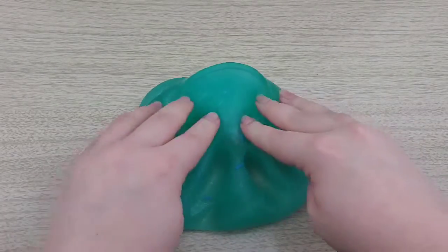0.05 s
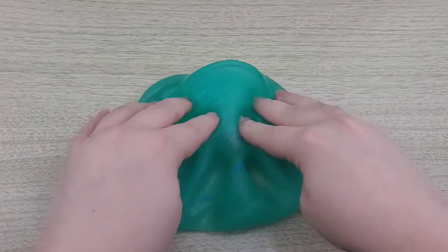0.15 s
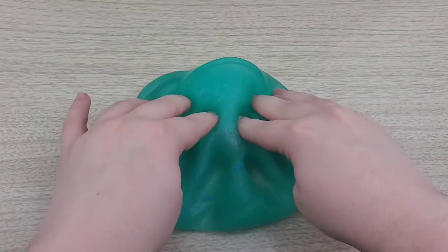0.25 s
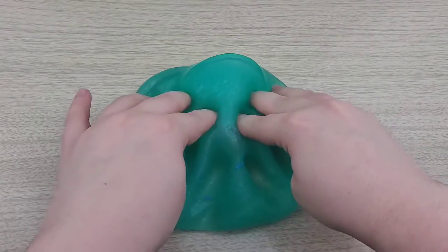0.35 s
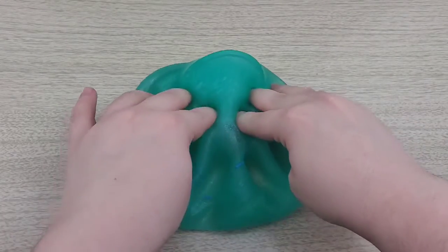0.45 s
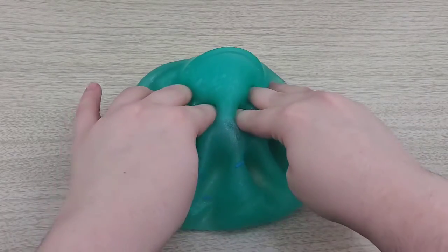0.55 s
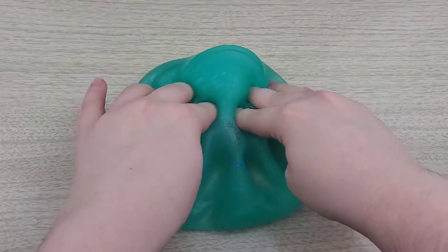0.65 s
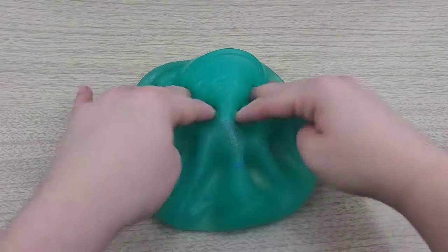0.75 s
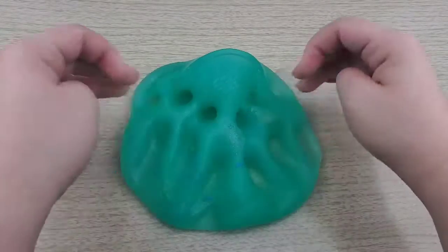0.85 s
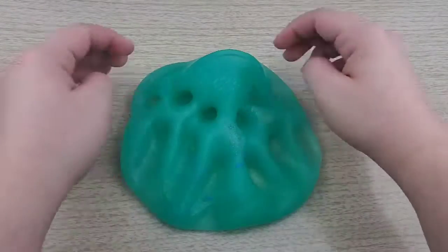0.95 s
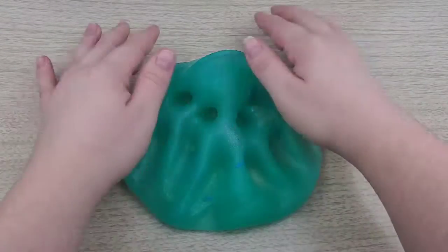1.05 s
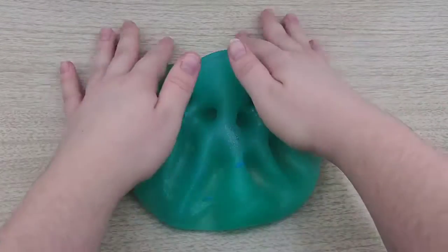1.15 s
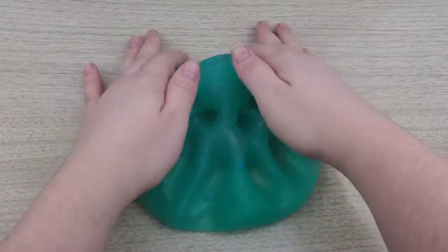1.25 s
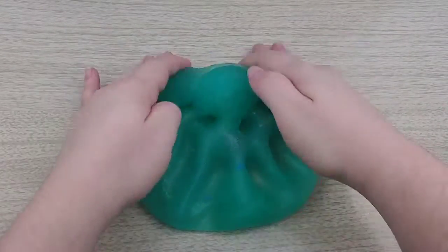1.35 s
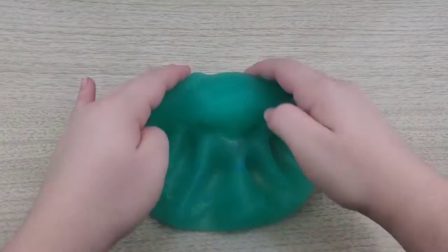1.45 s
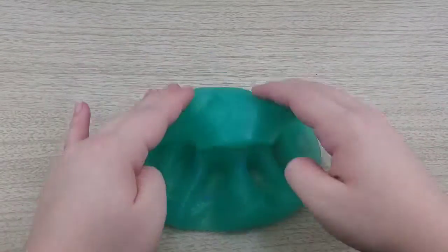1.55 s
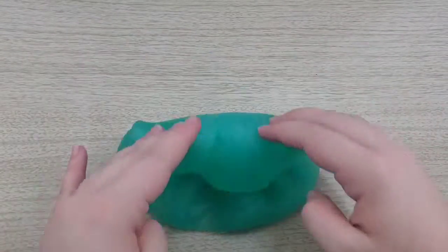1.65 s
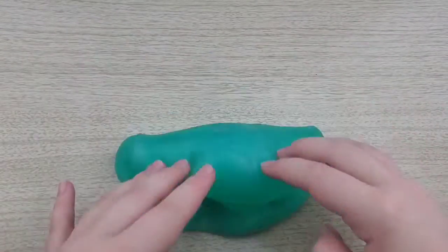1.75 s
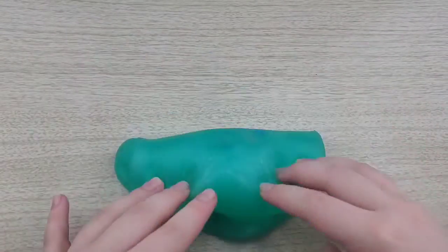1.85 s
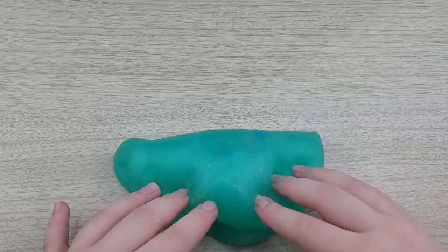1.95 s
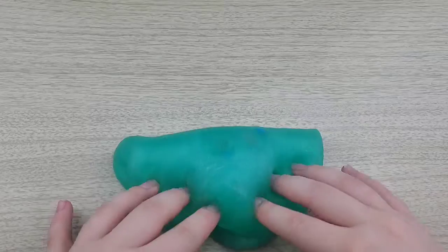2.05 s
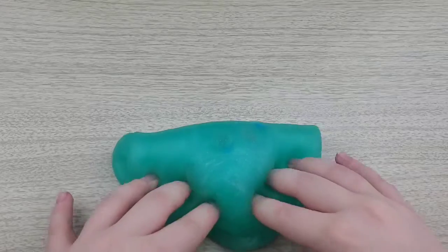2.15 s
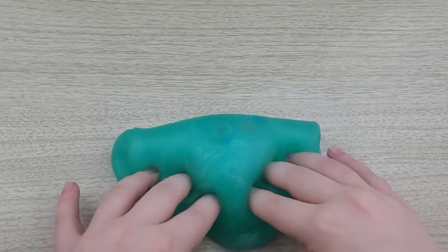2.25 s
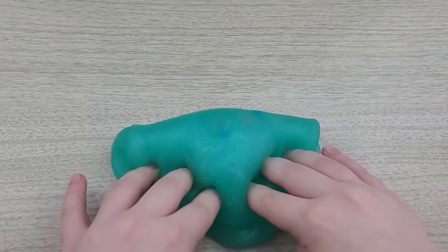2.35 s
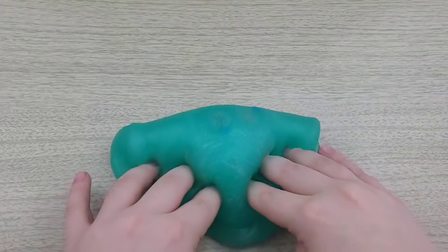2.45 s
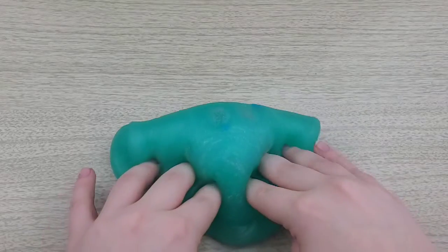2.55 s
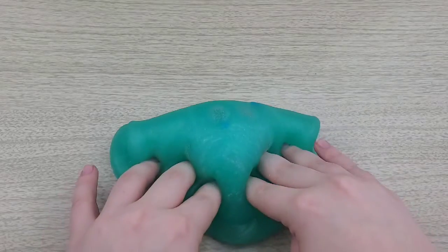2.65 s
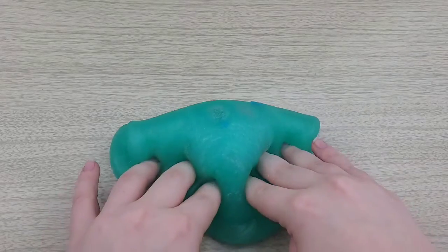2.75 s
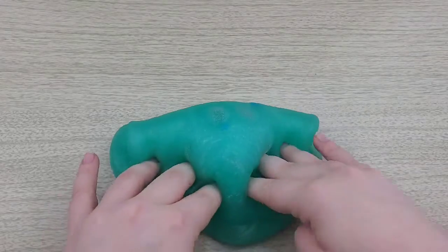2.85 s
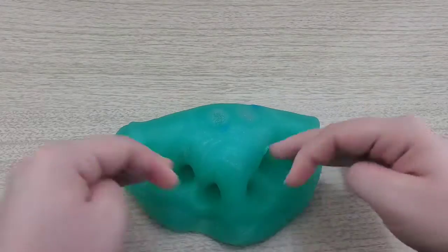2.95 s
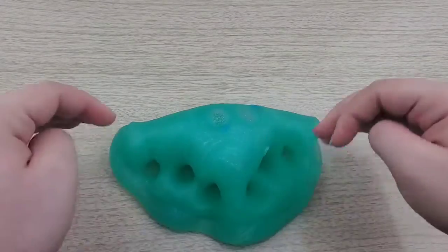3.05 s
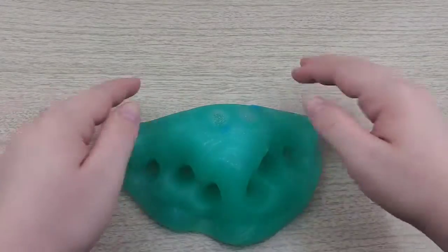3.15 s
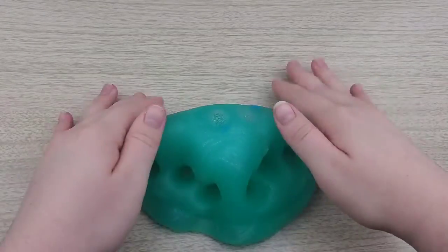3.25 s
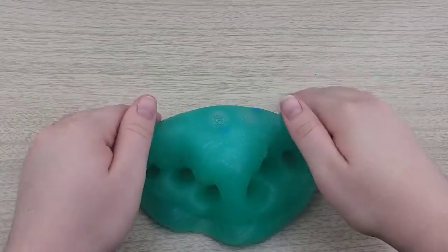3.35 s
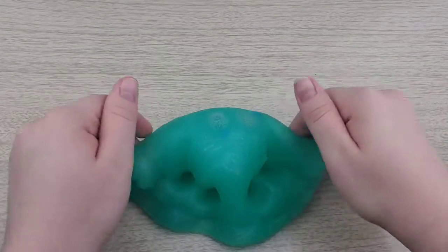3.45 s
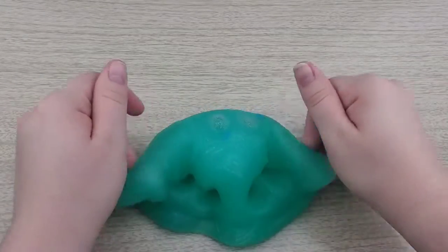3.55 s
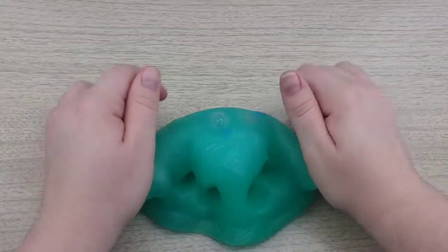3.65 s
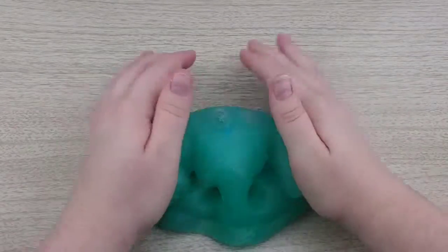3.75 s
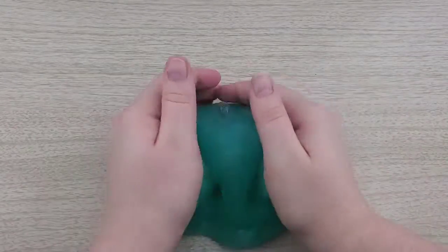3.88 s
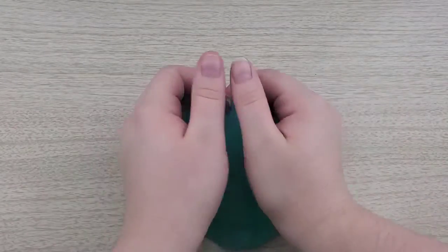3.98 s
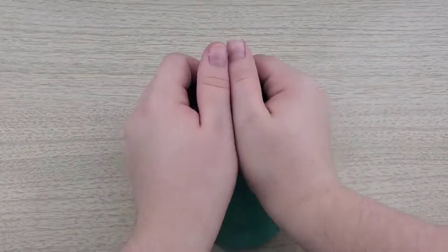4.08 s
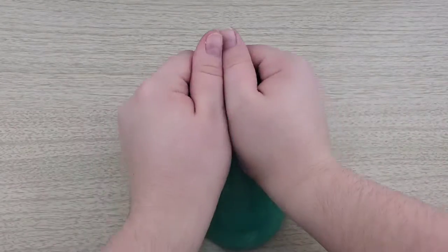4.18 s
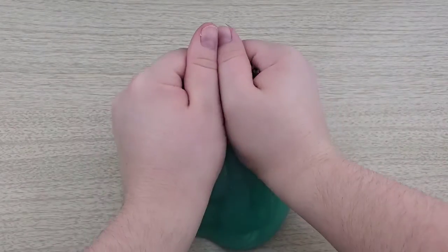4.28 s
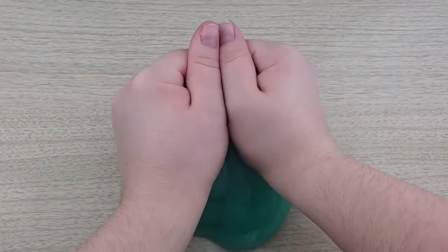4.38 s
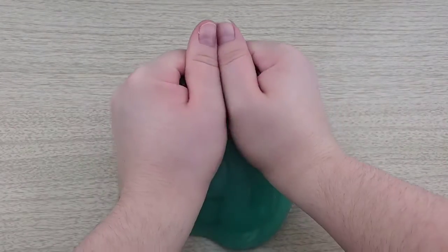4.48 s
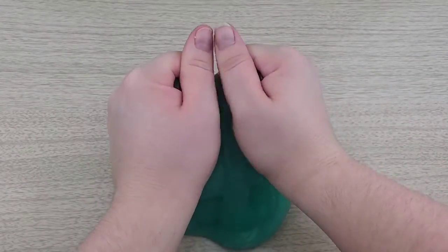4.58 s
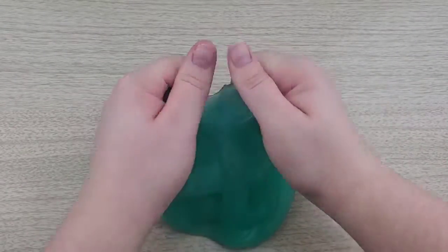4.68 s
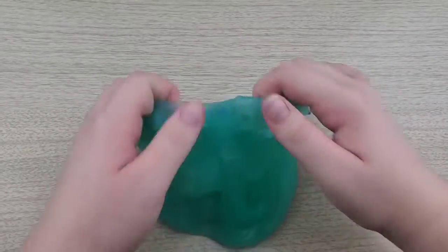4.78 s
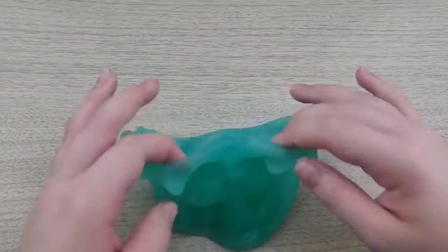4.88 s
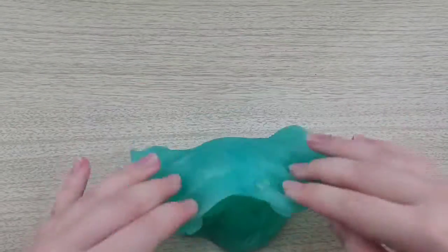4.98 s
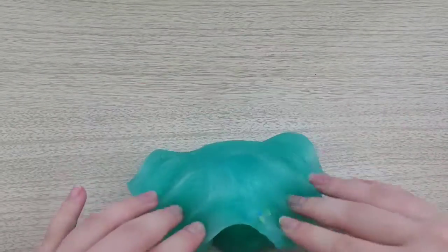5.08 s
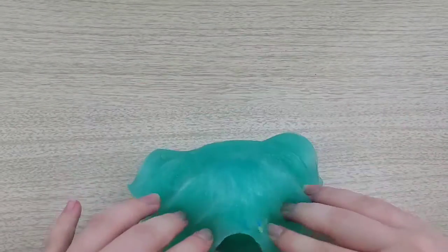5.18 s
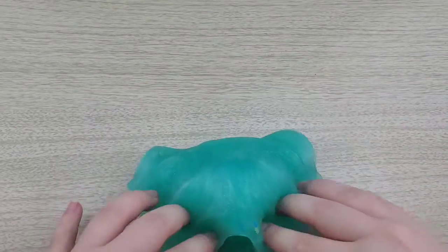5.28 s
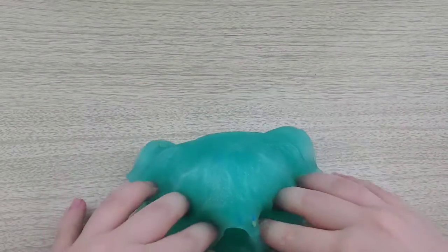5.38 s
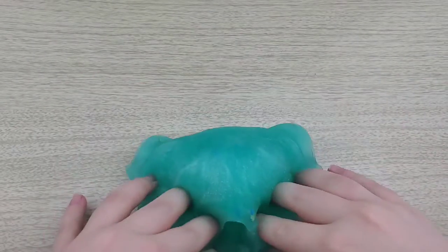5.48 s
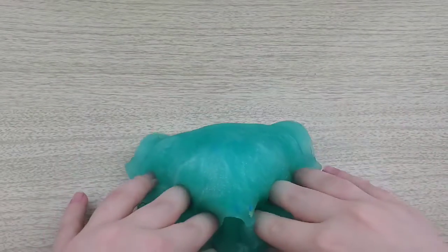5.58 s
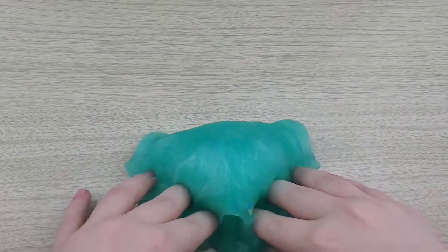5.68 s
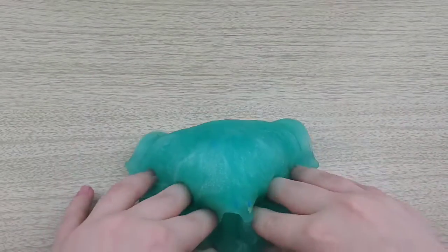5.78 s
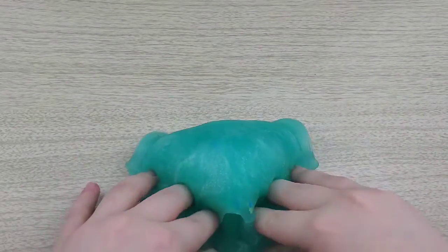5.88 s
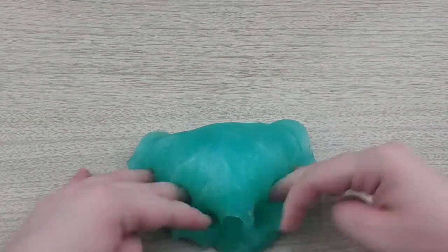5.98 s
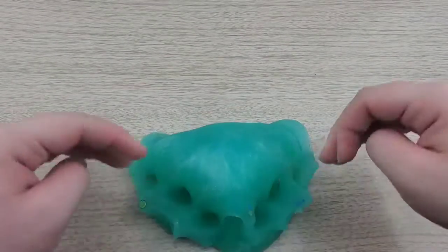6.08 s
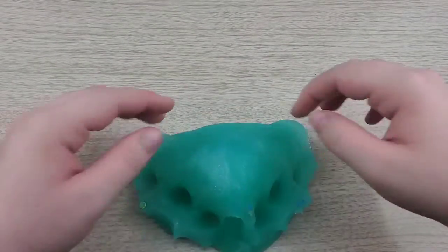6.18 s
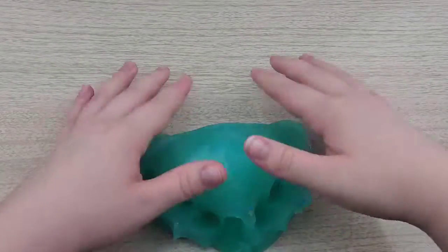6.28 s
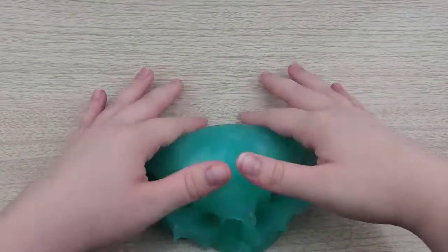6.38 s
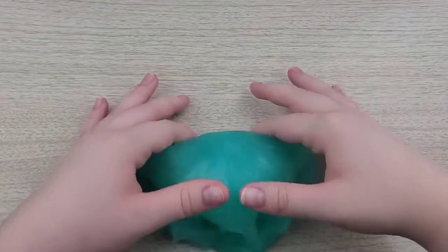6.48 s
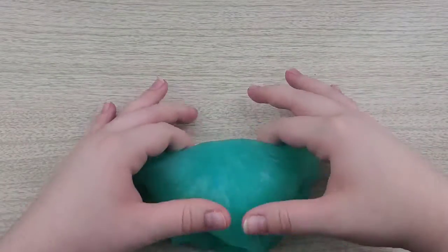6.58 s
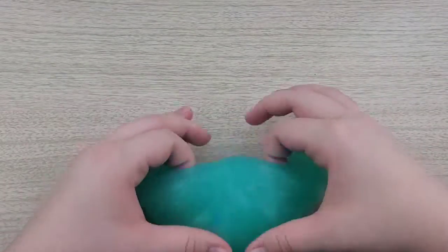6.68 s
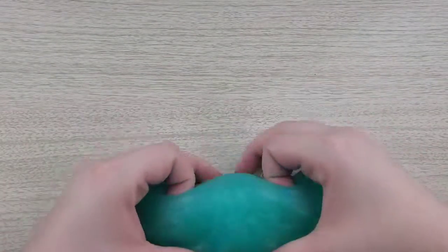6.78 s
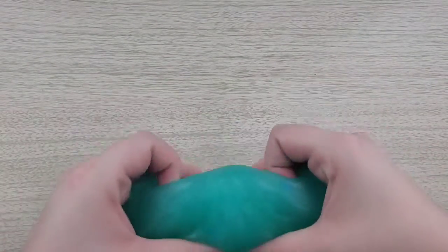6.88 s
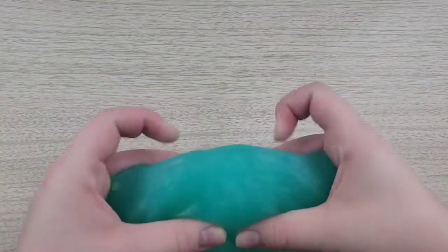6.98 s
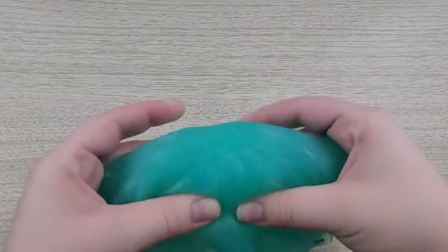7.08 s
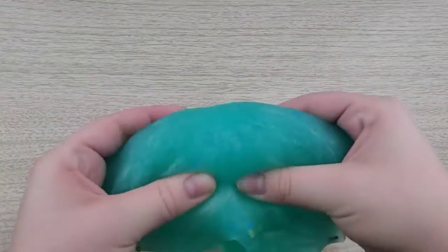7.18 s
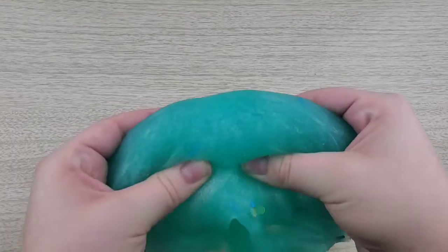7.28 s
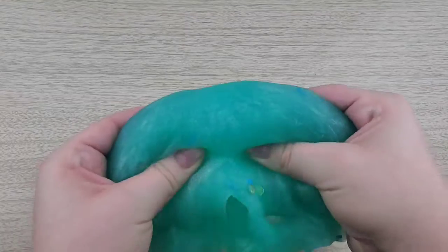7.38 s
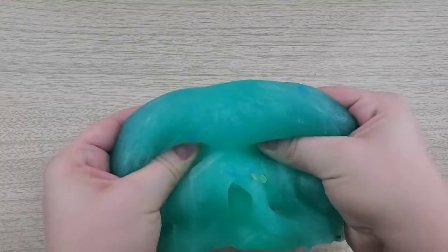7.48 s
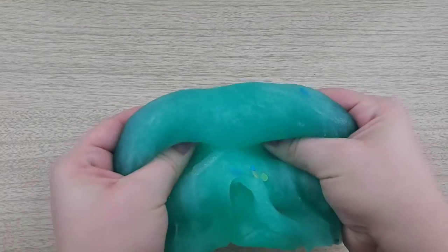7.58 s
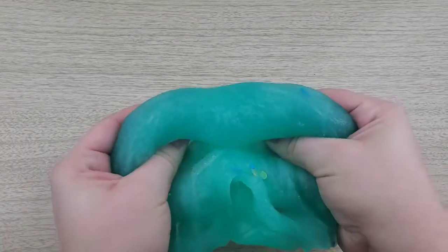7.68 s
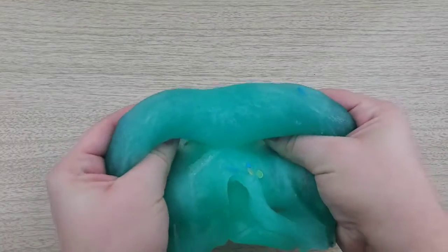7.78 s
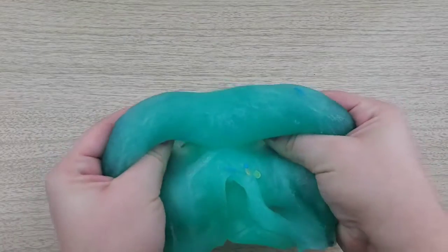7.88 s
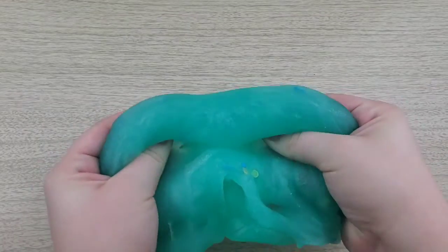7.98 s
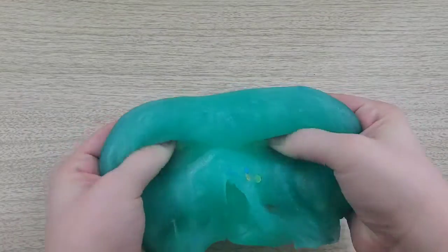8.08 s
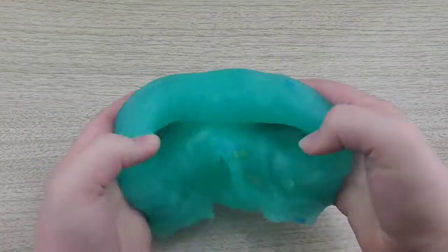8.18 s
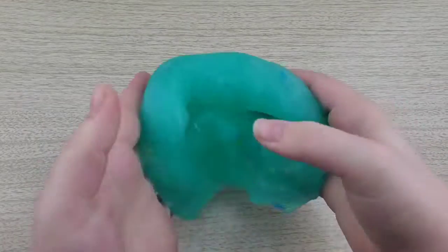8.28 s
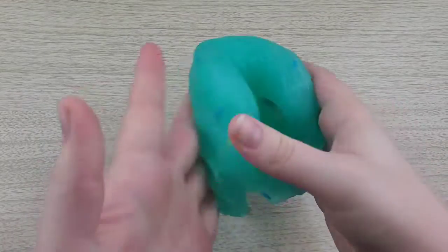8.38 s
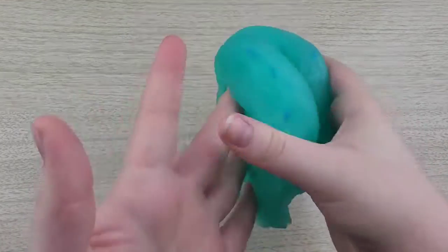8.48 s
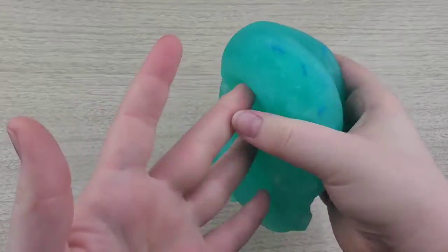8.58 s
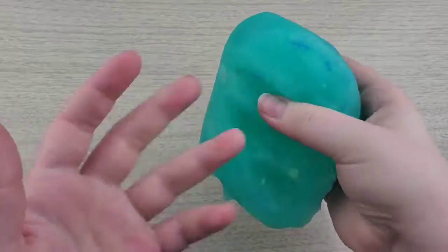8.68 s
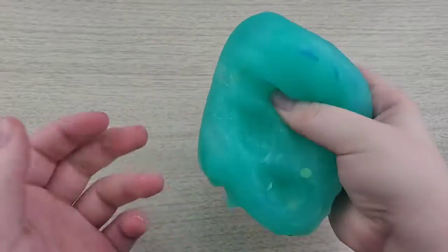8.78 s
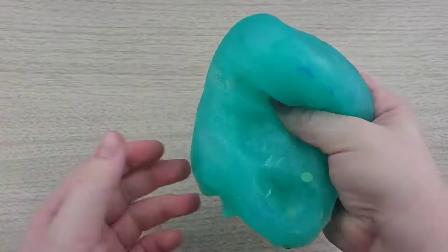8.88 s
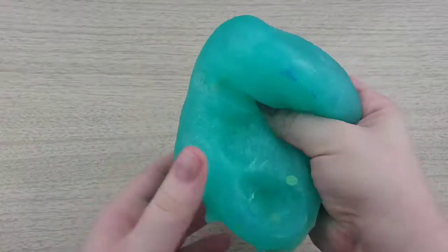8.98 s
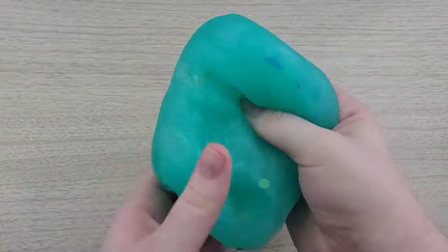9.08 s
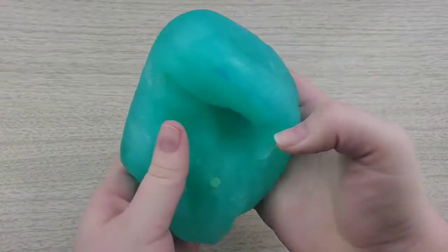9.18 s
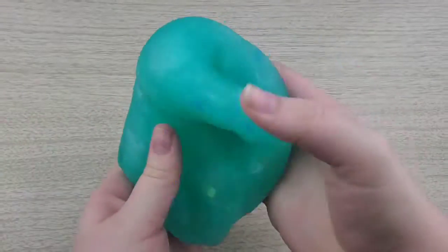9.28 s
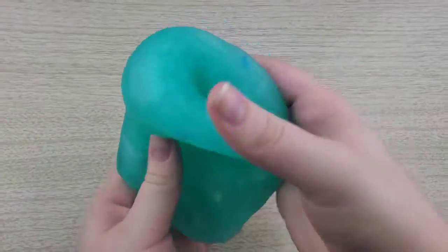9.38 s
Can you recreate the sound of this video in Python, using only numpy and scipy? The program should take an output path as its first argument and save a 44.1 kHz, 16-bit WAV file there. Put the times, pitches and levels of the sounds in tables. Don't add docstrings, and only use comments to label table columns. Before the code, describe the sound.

Close stereo sound of thick slime kneaded on a table in a small quiet room, with a faint low rumble and distant machine hum throughout. Near silence until 1.0 s, when a sharp bubble crack bursts with a hollow pop, wet peel and dull thud. Faint sticky rustle and small ticks follow, with a modest pop at 2.4. At 3.1-3.2 several hard snaps rattle off, then soft thuds to 3.5. From 4.4 to 4.7 come heavy, loud hollow pops and cracks, trailed by wet crackling around 4.9; the background dips, then recovers. Three very loud rapid snaps hit at 6.2. From 6.8 to 7.9 smaller pops and clicks scatter, with a tiny rising squeak at 7.1 and clearer snaps at 7.4 and 7.85. Around 8.35 a sticky sizzle and wet pop, then thin peeling crackles to 8.9, and last soft clicks near 9.35. Brief room echo follows bursts.

```python
import sys
import numpy as np
from scipy import signal
from scipy.fft import rfft, irfft
from scipy.io import wavfile
from scipy.ndimage import uniform_filter1d

SR = 44100
rng = np.random.default_rng(int(sys.argv[2]) if len(sys.argv) > 2 else 0)


def inscribe(sig):
    pcm = np.round(np.clip(np.atleast_2d(sig).T, -1, 1) * 32767)
    wavfile.write(sys.argv[1], SR, pcm.astype(np.int16))


def boost(x):
    u = np.asarray(x, float) / 20
    return 10 ** u


N = 416304

# (t/s, peak level/dB, opening f/Hz, crack over ring level/dB, right port lag/ms)
SNAPS = [(0.996, -25, 12700, 6, .14), (1.0316, -6.5, 4550, -7, .098), (2.3709, -36, 8500, -2, .038),
         (3.1188, -21, 5840, -4, .24), (3.1385, -6.5, 4430, 5, -.15), (3.164, -11, 4350, -12, .016),
         (3.1884, -26, 6300, -8, .3), (4.4283, -10, 3600, 3, .11), (4.4779, -5, 3400, 2, .033),
         (4.5482, -3.5, 4250, -15, .042), (4.6808, -28, 12900, -3.5, -.08),
         (4.6902, -30, 14080, -1.5, .069), (6.1865, -4.5, 5100, -4.5, .2), (6.2072, -2, 5450, .6, .13),
         (6.2269, -6, 5000, 5, .066), (6.8102, -33, 9500, 2.5, -.07), (6.8358, -30, 4800, 3, .17),
         (6.9085, -38, 4670, 7, .062), (7.207, -46, 4780, -5, .12), (7.4, -27, 7000, 2, .14),
         (7.8392, -29, 6180, -.6, .078), (7.8586, -17.5, 6500, 3.5, .15), (8.3714, -22, 6600, -9, .35),
         (9.335, -37, 14300, -5, .14), (1.0318, -11, 5750, -6, .1), (3.1645, -8.5, 6100, -1, .02),
         (2.3707, -39, 4300, 0, .04), (7.2068, -50, 3400, -12, -.1), (1.032, -10, 12800, -13, .1),
         (4.4768, -13, 5600, 2, .05)]
# (t/s, peak level/dB, opening f/Hz, crack over ring level/dB)
TICKS = [(1.4676, -55, 13760, -7.5), (1.829, -47, 6070, -7), (1.8594, -62, 14970, -1),
         (2.28, -58, 12000, 1.5), (2.409, -45, 6300, 2), (3.3862, -51, 5200, -13),
         (4.2512, -64, 6300, -21.5), (4.361, -54, 14050, -1), (4.7278, -43, 12000, 0),
         (4.817, -64, 9030, 2.5), (4.862, -49, 5000, -8), (4.8711, -43, 15100, 3), (4.9047, -40, 4090, -.6),
         (5.1377, -58.5, 9260, 0), (5.21, -59, 12000, -1), (5.3007, -66, 15400, 0), (5.524, -66, 5400, -15),
         (6.8597, -42, 5000, -12), (6.9465, -47, 3750, 2), (6.979, -41, 4000, 1.5), (7.1172, -53, 4220, -9),
         (7.1936, -49, 4460, -15), (7.5632, -45, 13000, 6), (7.6052, -62, 14780, 0),
         (7.6386, -60, 14950, -2), (8.4195, -43, 14670, -11), (8.5144, -45, 6450, -8),
         (8.8347, -46.5, 15430, -1.5), (8.8687, -45, 9310, -6.5), (9.3635, -42, 13500, 1),
         (6.815, -44, 6000, 0), (6.9145, -44, 6000, 0), (9.3445, -42, 5000, -3), (9.348, -43, 5000, 0)]
# (t/s, peak level/dB, cavity f/Hz, sharpness, room share level/dB)
POCKETS = [(0.997, -44.5, 700, 1.2, 4.5), (1.012, -44, 2200, 2.4, -9), (1.0315, -23, 1400, 1, 2),
           (1.033, -31, 640, 6, -5), (1.033, -33, 1040, 3.5, -5), (2.371, -39, 2100, .6, -7),
           (2.4097, -33.5, 655, 2, -12), (3.1191, -35, 650, 2.5, -1), (3.1388, -17, 1150, 3.8, -10),
           (3.14, -24, 650, 5, -12), (3.166, -42, 660, 5, -3), (3.139, -13, 1900, 1.8, -11),
           (3.1637, -26, 2500, .8, 6), (4.4277, -14, 2400, .9, -7), (4.4315, -16, 2900, 1.1, -4),
           (4.428, -33, 800, .78, -1), (4.4762, -3.5, 2450, 1, -5), (4.4765, -11, 1800, .6, -10),
           (4.481, -11, 2800, 1.4, -5), (4.5485, -13, 1850, 1, -15), (4.5485, -8.5, 3300, .85, 1),
           (6.187, -17, 1544, .96, 1.5), (6.2018, -29, 1450, 1.9, -4), (6.2068, -19, 1200, 1.7, -4),
           (6.2075, -12.5, 2150, 1.3, -8.5), (6.2245, -32, 645, 5, -6), (6.836, -31, 2300, .83, -11),
           (7.3996, -25, 3300, 1.8, -4), (8.3727, -30, 1650, 2.2, -10), (8.38, -33, 1420, 2.2, -10),
           (9.3414, -45, 4200, 1.6, -4), (9.369, -53, 1900, 2.4, -5), (4.477, -17, 1000, .6, -7),
           (4.4775, -27, 330, .6, -12), (4.549, -36, 450, .6, 4), (3.127, -36, 2200, 2.5, -8),
           (6.206, -36, 650, 4, -6), (4.428, -43, 220, .7, -12), (1.035, -36, 880, 4, -5)]
# (t/s, peak level/dB, cavity f/Hz, sharpness)
DIMPLES = [(1.7798, -70.5, 940, 1.5), (1.8285, -64, 3020, 2.3), (1.8594, -61, 3220, 2.5),
           (2.18, -65, 860, 1.2), (2.3704, -42, 680, 1.3), (2.4097, -42, 1700, .8), (2.5115, -55, 780, 1.5),
           (3.872, -74, 1465, 1.7), (4.2486, -52, 1400, .9), (4.871, -67, 690, 1.5),
           (4.9087, -53, 2956, 2.8), (5.5238, -50, 1250, .95), (6.772, -59, 1820, 1.8),
           (6.811, -47, 2400, .9), (6.9092, -49, 3200, 2.7), (6.911, -52, 1600, 1.6), (6.84, -58, 880, 1.5),
           (6.9446, -58, 1440, 1.5), (6.9788, -47, 2000, .8), (7.211, -57, 1300, 1.4),
           (7.858, -53, 1700, .72), (7.632, -57, 2200, 1.2), (7.839, -60, 1200, .6), (8.371, -50, 800, 1.4),
           (8.422, -52, 1580, 1.9), (8.517, -65, 1780, 1.42), (9.267, -69, 900, .84),
           (9.28, -59, 1500, 1.3), (9.3, -55, 1000, .7), (9.33, -62, 700, .6)]
# (full from t/s, hold/s, sizzle level/dB, swell/s per 20 dB, fade/s per 20 dB)
SLIDES = [(1.56, .29, -69, .11, .19), (2.28, .01, -82, .02, .1), (3.17, .03, -44, .01, .05),
          (3.61, .08, -72, .05, .21), (3.87, .02, -87, .03, .06), (4.03, .02, -74, .04, .14),
          (4.35, .05, -77, .14, .02), (4.682, .015, -59, .01, .04), (4.78, .05, -86, .05, .04),
          (5.04, .03, -74, .05, .19), (6.73, .06, -73, .08, .04), (7.02, .16, -78, .04, .05),
          (7.56, .03, -82, .01, .4), (8.28, .03, -62, .05, .04), (8.335, .025, -45.5, .05, .012),
          (8.425, .015, -56, .02, .04), (8.48, .06, -65, .04, .06), (8.58, .035, -61, .05, .045),
          (8.67, .05, -72, .05, .06), (8.76, .03, -67, .04, .05), (8.845, .025, -62, .03, .055)]
PULLS = [(.988, .024, -43.5, .008, .025), (3.118, .018, -42, .007, .01), (4.89, .11, -54.5, .035, .055),
         (6.811, .005, -55, .002, .012), (6.836, .004, -54, .002, .014), (6.858, .006, -57, .004, .015),
         (6.84, .04, -67, .03, .05), (6.909, .006, -55, .004, .02), (6.946, .008, -57, .006, .02),
         (6.979, .004, -59, .002, .012), (6.91, .07, -67, .03, .04), (7.184, .012, -69, .01, .015),
         (7.206, .008, -64, .002, .015), (8.33, .035, -52, .03, .02), (8.372, .008, -56, .02, .03),
         (9.336, .012, -49, .018, .03), (9.362, .01, -55, .01, .02), (9.38, .04, -64, .03, .1)]
# (f/Hz, level/dB per Hz)
SIZZLE_TONE = [(290, -59.5), (500, -20), (859, -12), (1590, -9), (3450, -8), (4290, -0.5), (5750, -2.5),
               (7380, -9.5), (9200, -10), (11500, -6), (15100, -4), (15800, -3.5), (16500, -19)]
# (t/s, peak level/dB, f/Hz)
THUDS = [(0.997, -42, 300), (1.032, -46, 335), (1.05, -46, 75), (1.075, -45, 300), (1.09, -48, 66),
         (2.402, -51, 86), (3.119, -38, 250), (3.139, -35, 310), (3.18, -43, 310), (3.235, -47, 70),
         (3.44, -52, 270), (3.392, -39, 190), (3.419, -40.5, 124), (3.449, -43, 139), (3.49, -48, 110),
         (3.53, -50, 200), (4.427, -52, 300), (4.487, -45, 480), (6.225, -42, 300), (6.219, -45, 96),
         (6.299, -43.5, 65), (9.268, -54, 220), (2.42, -52, 200), (2.455, -55, 170), (6.186, -42, 300),
         (8.37, -57, 300)]
# (f/Hz, level/dB, time to fall 60 dB/s)
TABLE_MODES = [(340, -8, .12), (628, -14, .2), (645, -11, 0.27), (664, -12, .2), (836, -9, .18),
               (885, -5, 0.24), (1077, -9, .14), (1136, -8, 0.14), (1300, -12, .17), (1420, -11, .16),
               (1780, -13, .16), (2085, -11, .17), (2440, -12, .17)]
# (f/Hz, level/dB, time to fall 60 dB/s)
ROOM_BANDS = [(250, 1.5, 0.1), (700, -0.5, 0.25), (1500, 1.5, 0.23), (3000, -2, 0.27), (4400, -9.5, .31),
              (5600, -8.5, 0.29), (7200, -5, 0.25), (8700, -8.5, .17), (10200, -4, .2), (12000, -3.5, .17),
              (15500, -2, 0.12)]
# (t/s, rumble level/dB)
RUMBLE_GAIN = [(0.0, -62), (0.2, -64), (3.0, -63), (3.78, -62.5), (4.1, -66.5), (4.55, -71), (4.89, -65),
               (5.18, -75), (5.89, -68), (6.23, -64), (6.86, -61.5), (7.26, -63), (7.6, -60), (7.99, -62.5),
               (8.36, -60), (8.78, -62.5), (9.44, -61)]
# (f/Hz, level/dB per Hz)
AIR_TONE = [(12, -35), (20, -18), (32, -8), (41, -1), (97, 1), (152, -9), (180, -12), (267, -12.5),
            (299, -17.5), (678, -41), (826, -40), (1190, -48.5), (3380, -48.5), (6470, -59), (15100, -49.5),
            (16900, -69)]
# (f/Hz, width/Hz, level/dB)
HUM_LINES = [(50.4, 0.94, -3.5), (98.4, 3.8, -6), (188, 3.7, -12), (260, 22, -13.5), (342, 7.3, -21),
             (375, 2, -23)]

HZ = np.fft.rfftfreq(N, 1 / SR)
CLICK = np.eye(1, 4096)[0]


def snaps():
    tick_lag_ms, tick_room_db = .07, 2.5
    room_db, room_per_crack = -5, -.35
    near, far = np.zeros((2, 2, N))
    treble = signal.butter(3, 6500, "high", fs=SR, output="sos")
    crack = peak(signal.sosfilt(treble, CLICK))
    late_crack = np.roll(crack, 150)
    rows = [(*row, 0) for row in SNAPS]
    rows += [(*row, tick_lag_ms, tick_room_db) for row in TICKS]
    for s, db, hz, crack_db, lag_ms, extra_db in rows:
        wet_db = room_db + room_per_crack * crack_db + extra_db
        sharp = np.clip(1.5 - .1 * crack_db, 1, 6)
        body = peak(hump(CLICK, hz, sharp))
        close = scattered(body + boost(crack_db) * crack, -5.5, 0.0024)
        add(near, close, s, db - 1.5, lag_ms, -10 * lag_ms)
        pulse = body + boost(crack_db) * late_crack
        add(far, np.array([pulse, pulse]), s, db + wet_db, 0, 0)
    return near, far


def pockets():
    dimple_room_db = -2.5
    ring_cycles, longest_s = 22, .045
    near, far = np.zeros((2, 2, N))
    rows = POCKETS + [(*row, dimple_room_db) for row in DIMPLES + squeak()]
    for s, db, hz, sharp, wet_db in rows:
        puff = hump(CLICK, hz, np.clip(sharp, .6, 6))
        note = peak(ring(puff, hz, min(ring_cycles * sharp / hz, longest_s)))
        puff = peak(puff)
        note_share = .7 * np.clip(sharp - .5, .15, 1)
        close = scattered(note_share * note + 1.5 * puff, -11, 0.0064)
        add(near, close, s, db - 5, .05, -1.2)
        pulse = np.roll(puff + .04 * note, 310)
        add(far, np.array([pulse, pulse]), s, db + wet_db, 0, 0)
    return near, far


def squeak():
    start_s, gap_s, sharp = 7.1182, .0165, 3.6
    top_db, slope_db = -59, 6
    hz, climb_hz = 2650, 110
    return [(start_s + k * gap_s, top_db - slope_db * abs(k), hz + k * climb_hz, sharp)
            for k in (-2, -1, 0, 1)]


def peeling():
    slide_squelch_db, pull_squelch_db = -11, -4.5
    fast_slide_db = -57
    slide, pull = effort(SLIDES), effort(PULLS)
    sizzle = slide + pull
    slide_squelch = np.sqrt(slide * np.minimum(slide, boost(fast_slide_db)))
    squelch = boost(slide_squelch_db) * slide_squelch + boost(pull_squelch_db) * pull
    size = boost(2.1 * rng.exponential(1, N) + 0.82 * walk(60))
    size *= boost(2.0 * walk(22))
    shared, left, right = size * rng.standard_normal((3, N))
    ports = np.array([shared + 0.67 * left, np.roll(shared, 5) + .9 * right])
    threads = colour(ports, SIZZLE_TONE)
    high = colour(threads, [(2200, -29), (4800, 2)])
    low = threads - high
    return unit(high) * sizzle * boost(3) + unit(low) * squelch * boost(0.2)


def effort(rows):
    t = np.arange(0, N / SR, .0005)
    total = 0
    for s, hold, db, swell, fade in rows:
        away = np.maximum((s - t) / swell, (t - s - hold) / fade)
        total = total + boost(db - 20 * np.clip(away, 0, None))
    return np.interp(np.arange(N) / SR, t, total)


def thuds():
    rise_s, fade_s, fade_cycles = .003, .025, 1.5
    out = np.zeros((2, N))
    t = np.arange(8192) / SR
    for s, db, hz in THUDS:
        shared, left, right = rng.standard_normal((3, len(t)))
        ports = shared + .15 * np.array([left, right])
        rumble = hump(np.tile(ports, 2), hz, 0.93)[:, len(t):]
        push = (1 - np.exp(-t / rise_s)) * np.exp(-t / (fade_s + fade_cycles / hz))
        add(out, peak(rumble * push), s, db, 0, 0)
    return out


def table_ring(push):
    damping = boost(4.5 * walk(90))
    total = 0
    for k, (hz, db, t60) in enumerate(TABLE_MODES):
        total = total + boost(db) * np.roll(damping, k * SR // 3) * ring(push, hz, t60)
    return total


def room(x):
    size = SR // 2
    t = np.arange(size) / SR
    hz = np.log(np.fft.rfftfreq(size, 1 / SR) + 1)
    centres = np.log([row[0] for row in ROOM_BANDS])
    shared, left, right = rng.standard_normal((3, size))
    noise = rfft(close_ports(shared, left - right))
    tail = 0
    for one, (_, db, t60) in zip(np.eye(len(ROOM_BANDS)), ROOM_BANDS):
        band = irfft(noise * np.interp(hz, centres, one), size)
        tail = tail + boost(db - 60 * t / t60) * band
    tail *= 1 - np.exp(-t / .004)
    return boost(-29) * signal.fftconvolve(x, tail, axes=1)[:, :N]


def close_ports(mid, side):
    treble = signal.butter(1, 600, "high", fs=SR, output="sos")
    side = signal.sosfilt(treble, side) * 0.4
    return np.array([mid + side, mid - side])


def background():
    mid, side = rng.standard_normal((2, N))
    side = colour(side, [(350, -16), (900, -0.5)])
    air = colour(np.array([mid + side, mid - side]), AIR_TONE)
    low = colour(air, [(400, -2.5), (700, -37.5)])
    hiss = air - low
    scale = 1 / np.std(low)
    swell = boost(2 * walk(3.5))
    gain_db = np.interp(np.arange(N) / SR, *np.transpose(RUMBLE_GAIN))
    rumble = boost(gain_db) * (boost(-3.5) * swell * scale * low + motor_hum())
    return rumble + boost(0.28 * (gain_db + 68.5) - 64) * scale * hiss


def motor_hum():
    total = 0
    for hz, width, db in HUM_LINES:
        line = rfft(rng.standard_normal(N)) / (1 + ((HZ - hz) / width) ** 2)
        total = total + boost(db) * unit(irfft(line, N))
    return total


def hump(x, hz, sharp):
    highest = .45 * SR
    b, a = signal.iirpeak(min(hz, highest), sharp, SR)
    edge = signal.butter(4, min(hz * (1 + .8 / sharp), highest), fs=SR, output="sos")
    twice = signal.lfilter(b, a, signal.lfilter(b, a, x))
    return signal.sosfilt(edge, twice)


def ring(push, hz, t60):
    pole = np.exp(2j * np.pi * hz / SR - np.log(1000) / (t60 * SR))
    return signal.lfilter([1], [1, -pole], push).imag


def scattered(pulse, echo_db, spread_s):
    t = np.arange(512) / SR
    struck = rng.random((2, 512)) < .12
    echoes = rng.standard_normal((2, 512)) * struck * np.exp(-t / spread_s)
    heard = signal.fftconvolve(pulse[None], CLICK[:512] + boost(echo_db) * echoes, axes=1)
    energy = np.sum(heard ** 2, axis=1, keepdims=True)
    return heard * np.sqrt(2 * np.sum(pulse ** 2) / energy)


def add(out, sound, s, db, lag_ms, pan_db):
    for side, sign in enumerate((1, -1)):
        i = int(s * SR - sign * lag_ms * SR / 2000)
        n = min(sound.shape[1], N - i)
        out[side, i:i + n] += boost(db + sign * pan_db / 2) * sound[side, :n]


def colour(x, points):
    hz, db = np.transpose(points)
    return irfft(rfft(x) * boost(np.interp(np.log(HZ + 1), np.log(hz), db)), N)


def walk(rate):
    k = int(SR / rate)
    steps = np.repeat(rng.standard_normal(N // k + 1), k)
    return unit(uniform_filter1d(uniform_filter1d(steps, k), k)[:N])


def unit(x):
    return x / np.sqrt(np.mean(x ** 2))


def peak(x):
    return x / np.max(np.abs(x))


def scene():
    crack, crack_far = snaps()
    hollow, hollow_far = pockets()
    sizzle = peeling()
    table = table_ring(hollow_far[0])
    far = crack_far + hollow_far + boost(-46.5) * table + boost(-6) * sizzle
    near = crack + hollow + boost(-47) * table + sizzle
    return near + room(far) + thuds() + background()


def roll_off(x):
    return signal.sosfilt(signal.butter(12, 17010, fs=SR, output="sos"), x)


def record(dry):
    soft = .8 * np.tanh(dry / .8)
    top_cut = signal.ellip(10, .3, 80, 16000, fs=SR, output="sos")
    return roll_off(signal.sosfilt(top_cut, soft))


dry = scene()
out = record(dry)
inscribe(out)
```